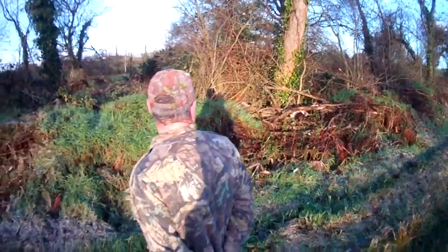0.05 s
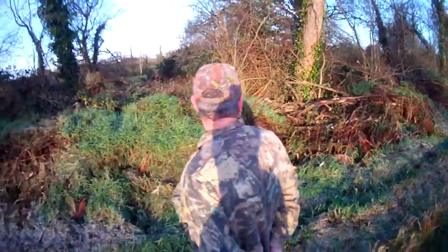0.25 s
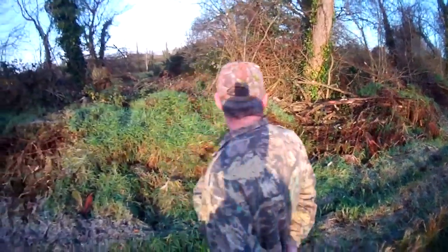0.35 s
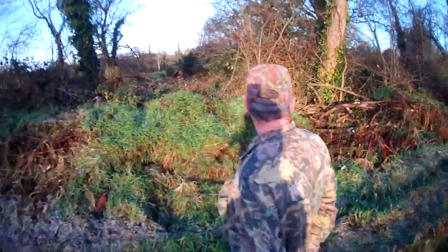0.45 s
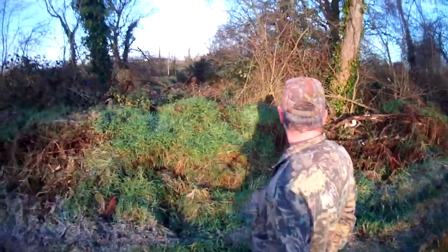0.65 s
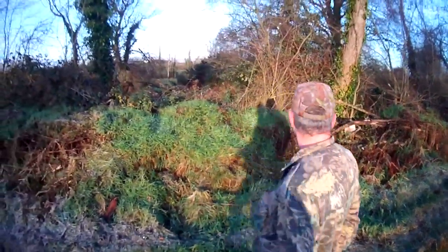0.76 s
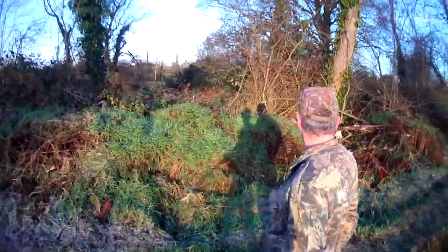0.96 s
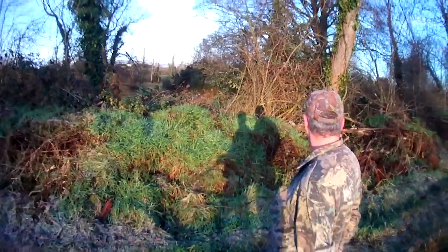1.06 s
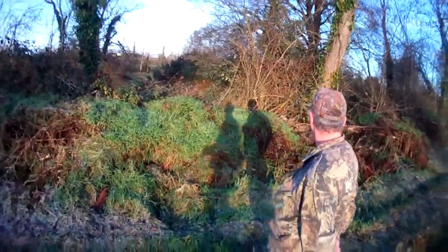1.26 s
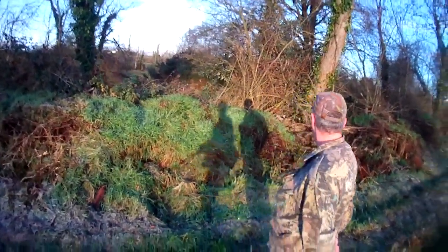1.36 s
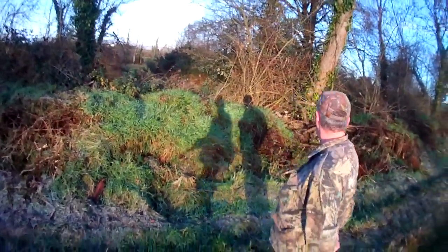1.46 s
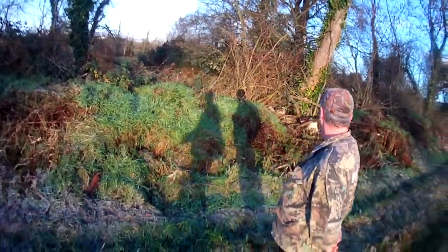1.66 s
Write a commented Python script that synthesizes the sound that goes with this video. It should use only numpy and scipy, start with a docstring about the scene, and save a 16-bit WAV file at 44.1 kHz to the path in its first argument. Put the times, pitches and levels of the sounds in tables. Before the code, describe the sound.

A dry twig snaps once, sharp and bright, close to the microphone at about 0.3 seconds, with a faint echo from the trees. Much quieter steps crush rough grass throughout, with swishes, jacket rubs, a few soft bumps and stem ticks that cluster near 1.4 seconds. From 0.7 to 1.5 seconds a distant bird whistles four thin, high notes over a steady hush and slight wind rumble.

```python
"""A dry twig gives way underfoot with one sharp snap, close to the microphone at the edge of a wood.
Its fibres split and ring; the sound scatters off the undergrowth and returns faintly from the trees.
Around it, steps crush rough grass, stems swish and tick, a jacket rubs and there are a few soft bumps.
Far off a bird pipes four thin notes over a steady hush, while light air rumbles on the microphone."""
import sys
import numpy as np
from scipy import signal
from scipy.fft import rfft, irfft, next_fast_len
from scipy.io import wavfile
from scipy.ndimage import map_coordinates

SR = 44100
rng = np.random.default_rng(int(sys.argv[2]) if len(sys.argv) > 2 else 0)


def wav_out(sig):
    """Save sig, one row per channel (or a flat mono array), as 16-bit PCM at SR to the path in sys.argv[1]."""
    wavfile.write(sys.argv[1], SR, np.round(np.clip(np.atleast_2d(sig).T, -1, 1) * 32767).astype(np.int16))


N = 74970


def amp(db):
    """Decibels to gain."""
    return 10 ** (np.asarray(db) / 20)


def unit(x):
    """Scale to rms 1."""
    return x / np.sqrt(np.mean(x ** 2) + 1e-20)


def along(points, hz):
    """Interpolate (frequency [Hz], value) points on a log axis."""
    freqs, values = np.transpose(points)
    return np.interp(np.log(hz + 1), np.log(freqs + 1), values)


def since(start=0):
    """Seconds since start, zero before it."""
    return np.maximum(np.arange(N) / SR - start, 0)


def level(rows):
    """Gain per sample from (time [s], level [dB]) points."""
    return amp(np.interp(since(), *np.transpose(rows)))


def fade(t, t60):
    """Sudden start, then a decay of 60 dB in t60 seconds."""
    return (t > 0) * np.exp(-np.log(1000) * t / t60)


def wobble(rate):
    """A smooth random curve, rate knots a second."""
    return map_coordinates(rng.standard_normal(2048), [since() * rate], mode="wrap")


def colour(x, spectrum, tilt_db=0):
    """Causal filter with the given spectrum and tilt per octave; rms 1."""
    size = 2 * next_fast_len(N)
    hz = np.fft.rfftfreq(size, 1 / SR)
    octaves = np.log2(np.clip(hz, 1000, 16000) / 4000)
    gain = amp(along(spectrum, hz) + tilt_db * octaves)
    cepstrum = irfft(np.log(np.maximum(gain, 1e-6)))
    cepstrum[1:size // 2] *= 2  # fold to minimum phase
    cepstrum[size // 2 + 1:] = 0
    return unit(irfft(rfft(x, size) * np.exp(rfft(cepstrum)))[:N])


def noise(spectrum):
    """Coloured noise of rms 1."""
    return colour(rng.standard_normal(N), spectrum)


def echo(x, decay, delay_s):
    """Diffuse reflections in which each frequency dies at its own speed."""
    hz, t, bands = signal.stft(rng.standard_normal(SR // 2), SR, nperseg=128)
    bands = bands * fade(t + 1e-9, along(decay, hz)[:, None])
    tail = signal.istft(bands, SR, nperseg=128)[1]
    delayed = np.pad(x, (int(delay_s * SR), 0))
    return signal.fftconvolve(delayed, tail / np.linalg.norm(tail))[:N]


def burst(start, t60, spectrum, tilt_db=0):
    """A dying cluster of tiny fractures, coloured by the stick that carries it."""
    shape = fade(since(start), t60)
    return colour(shape * rng.standard_normal(N), spectrum, tilt_db) * np.sqrt(np.mean(shape ** 2))


def brush(strokes, spectrum, rough_db):
    """Friction noise that swells and fades with each stroke."""
    swell = sum(amp(db) * np.exp(-((since() - centre) / half) ** 2) for centre, half, db in strokes)
    return swell * amp(rough_db * wobble(300)) * noise(spectrum)


# Open air all around: (frequency [Hz], gain [dB])
HUSH_SPECTRUM = [(53, -51), (90, -4), (204, -9), (639, -2.5), (983, -2.5), (1580, -2.5), (2000, -13),
                 (2140, -16.5), (2540, -5.5), (3580, -7.5), (4350, 0), (6270, -8), (10100, -8.5),
                 (15500, -10)]
# Breeze on the microphone: (time [s], level [dB])
GUSTS = [(0, -83), (.11, -70.5), (.18, -78), (.27, -73), (.46, -67.5), (.52, -77), (.61, -68), (.68, -79),
         (1.35, -81.5), (1.53, -75.5), (1.7, -84)]
# Its rumble: (frequency [Hz], gain [dB])
GUST_SPECTRUM = [(10, -8), (25, 3.5), (38, 4), (60, -6.5), (100, -19), (200, -39), (600, -58)]

def air(hush_db=-67):
    """Steady outdoor hush, and a light breeze buffeting the microphone."""
    hush = amp(hush_db + 1.5 * wobble(7.4)) * noise(HUSH_SPECTRUM)
    return hush + level(GUSTS) * noise(GUST_SPECTRUM)


# Reverberation of the wood: (frequency [Hz], t60 [s])
TREE_DECAY = [(300, 0.48), (4000, 0.1), (14000, .18)]

def trees(x, delay_s):
    """The trees beyond send back a diffuse answer."""
    return echo(x, TREE_DECAY, delay_s)


# Notes from far off: (start [s], length [s], top pitch [Hz], opening rise [Hz], level [dB])
BIRD_NOTES = [(.708, .112, 4075, 500, -56.5), (.946, .12, 3930, 260, -53), (1.183, .112, 3910, 200, -54.3),
              (1.43, .075, 3820, 60, -55.5)]

def bird(rise_s=.018, sag_hz=35, waver_hz=9, flutter_db=1, attack_s=.034, release_s=.032):
    """A distant bird's pure whistles slide up, hold and sag a little, echoing among the trees."""
    song = np.zeros(N)
    for start, length, top_hz, rise_hz, db in BIRD_NOTES:
        t = since(start)
        rise = rise_hz * np.exp(-t / rise_s)
        sag = sag_hz * np.minimum(t / length, 1) ** 4
        hz = top_hz - rise - sag + waver_hz * wobble(120)
        shape = np.clip(t / attack_s, 0, 1) * np.clip((length - t) / release_s, 0, 1)
        whistle = np.sqrt(2) * np.sin(2 * np.pi * np.cumsum(hz) / SR)
        song += amp(db + flutter_db * wobble(90)) * shape * whistle
    return song + amp(-13) * trees(song, delay_s=.034)


# Jacket rubs near the microphone: (centre [s], half length [s], level [dB])
JACKET_RUBS = [(.122, 0.0067, -60), (.365, .045, -63), (.66, 0.074, -65.5), (.85, 0.096, -68.5),
               (1.02, 0.038, -63), (1.215, .01, -64), (1.33, 0.062, -62.5)]
# The cloth: (frequency [Hz], gain [dB])
CLOTH_SPECTRUM = [(80, -38), (200, -11.5), (380, -9.5), (700, -5.5), (1350, 4), (2200, -3), (4000, -6.5),
                  (10000, -51)]

def jacket():
    """Cloth rubs as the body turns."""
    return brush(JACKET_RUBS, CLOTH_SPECTRUM, rough_db=2.5)


# Soft bumps close by: (time [s], level [dB], pitch [Hz], t60 [s])
SOFT_BUMPS = [(.528, -52, 505, 0.044), (.528, -61, 266, 0.11), (.598, -62, 270, .05),
              (.922, -60.5, 393, 0.064), (1.575, -61, 330, 0.056), (1.577, -52.5, 229, 0.033)]

def bumps(attack_s=.0017, jitter_rad=.82, low_cut_hz=170):
    """Dull, quickly damped knocks of boots or of a hand on the camera."""
    knocks = np.zeros(N)
    for start, db, hz, t60 in SOFT_BUMPS:
        t = since(start)
        shape = fade(t, t60) * (1 - np.exp(-t / attack_s))
        knocks += amp(db) * shape * np.sin(2 * np.pi * hz * t + jitter_rad * wobble(200))
    return signal.sosfilt(signal.butter(4, low_cut_hz, "high", fs=SR, output="sos"), knocks)


# Steps in the rough grass: (time [s], level [dB])
TREAD_LEVEL = [(0, -54), (.066, -58.5), (.122, -56), (.146, -59), (.2, -55), (.245, -56.5), (.288, -57),
               (.33, -53), (.392, -53), (.454, -63.5), (.586, -61), (.625, -60), (.68, -64), (.732, -54),
               (.756, -62), (.79, -53.5), (.88, -56), (.946, -54), (1.03, -58), (1.074, -60), (1.16, -58.5),
               (1.25, -62), (1.355, -58.5), (1.386, -58), (1.42, -52), (1.444, -61.5), (1.462, -53),
               (1.485, -64.5), (1.53, -62), (1.6, -63.5), (1.7, -61)]
# Crushed grass: (frequency [Hz], gain [dB])
GRASS_SPECTRUM = [(120, -79), (200, -15), (385, -11), (544, -9), (618, -9), (1090, -9.5), (1880, -4),
                  (2800, -0.5), (3120, -0.5), (4030, 5), (6830, -12), (12900, -23.5), (15500, -29)]

def tread(crackles_per_s=1500, spread_db=3, crackle_db=-6):
    """Grass crushed underfoot gives dense tiny crackles over a rustle."""
    sizes = amp(spread_db * np.minimum(rng.exponential(size=N), 4)) * rng.standard_normal(N)
    crackle = colour(sizes * (rng.random(N) < crackles_per_s / SR), GRASS_SPECTRUM)
    crush = level(TREAD_LEVEL) * amp(1.15 * wobble(70.6))
    return crush * unit(noise(GRASS_SPECTRUM) + amp(crackle_db) * crackle)


# Swishes at boot height: (centre [s], half length [s], level [dB])
BLADE_STROKES = [(.2185, .0055, -43.5), (0.224, 0.055, -56), (0.326, 0.041, -58), (0.613, .018, -53),
                 (0.719, 0.057, -58.5), (1.04, 0.0086, -56.5), (1.512, 0.013, -57)]
# Sliding blades: (frequency [Hz], gain [dB])
BLADE_SPECTRUM = [(290, -63), (500, -19), (2010, -11), (2720, -5.5), (3850, -3.5), (4190, -3), (4440, -2.5),
                  (11000, -14.5), (12100, -12.5), (15500, -18)]

def swishes():
    """Blades of grass brush past the boots."""
    return brush(BLADE_STROKES, BLADE_SPECTRUM, rough_db=3.03)


# Ticks around the feet: (time [s], level [dB], t60 [s], treble tilt [dB/octave])
STEM_TICKS = [(0.1107, -46.5, 0.036, -3), (0.235, -47, 0.017, 2), (0.2466, -48, 0.016, 7),
              (0.2609, -54, 0.011, 1), (0.603, -44, 0.043, 4.5), (0.646, -51.5, 0.09, 4),
              (0.724, -48.5, 0.083, 3), (0.7952, -44.5, 0.029, 1.5), (0.8336, -51.5, 0.023, -11),
              (0.865, -50.5, 0.023, -11.5), (0.925, -57.5, 0.04, 9), (1.178, -49, 0.025, -1.5),
              (1.3505, -52.5, 0.041, -11.5), (1.367, -47, 0.053, 5), (1.3968, -38.5, 0.012, 5),
              (1.4004, -42, 0.015, -.5), (1.4094, -37.5, 0.02, 2.5), (1.414, -45.5, 0.022, -4.5),
              (1.456, -48, 0.011, 11.5), (1.553, -57, .02, -8), (1.579, -52.5, 0.03, -2.5),
              (1.6313, -52, 0.047, 3.5)]
# A dry stem: (frequency [Hz], gain [dB])
STEM_SPECTRUM = [(100, -33), (300, -39.5), (650, -25), (1400, -9), (2500, -4), (4100, 2), (5200, -7.5),
                 (7000, -14.5), (13000, -25), (15500, -31)]

def stems():
    """Dry stems and leaves tick, each with its own brightness."""
    return sum(amp(db) * burst(start, t60, STEM_SPECTRUM, tilt) for start, db, t60, tilt in STEM_TICKS)


# Scatter near the ground: (frequency [Hz], t60 [s])
UNDERGROWTH_DECAY = [(500, 0.1), (4000, 0.033), (14000, .028)]

def undergrowth(x):
    """Nearby growth scatters the sound back almost at once."""
    return echo(x, UNDERGROWTH_DECAY, delay_s=.002)


# Close up, the twig cracks, then breaks in quick stages: (time [s], relative level [dB], pitch [Hz])
TWIG_BREAKS = [(0.2642, -27.5, 4270), (0.2657, -27.5, 5070), (.2992, -14, 5720), (.3003, -13, 5390),
               (.3018, -20.5, 5240)]
# Its modes: (ratio to the pitch, gain [dB], t60 [s])
TWIG_MODES = [(.62, -18, 0.0059), (.8, -9, .009), (1.039, -2, 0.013), (1.62, -13.5, 0.02)]
# Splitting fibres: (frequency [Hz], gain [dB])
FIBRE_SPECTRUM = [(100, -38), (300, -46), (650, -19), (1160, -23), (1750, -10), (2500, -10), (3200, -3),
                  (4500, -6), (5600, 6), (6600, -8.5), (8800, -5), (10600, -11.5), (14500, -14),
                  (15600, -26)]

def twig(crack_db=-5, crack_t60_s=.0058, ring_db=-7.5, low_cut_hz=2540):
    """Each stage of the break is a burst of splitting fibres and a very short ring of the wood."""
    crack, ring = np.zeros(N), np.zeros(N)
    for start, db, hz in TWIG_BREAKS:
        t = since(start)
        crack += amp(db) * burst(start, crack_t60_s, FIBRE_SPECTRUM)
        for ratio, mode_db, t60 in TWIG_MODES:
            ring += amp(db + mode_db) * fade(t, t60) * np.sin(2 * np.pi * hz * ratio * t)
    # cut the lows so the ring stays thin and bright
    ring = signal.sosfilt(signal.butter(2, low_cut_hz, "high", fs=SR, output="sos"), ring)
    return amp(ring_db) * ring + amp(crack_db) * crack


def scene():
    """One microphone at the wood's edge: snap and walker close by, trees and bird beyond."""
    snap = twig()
    near = snap + amp(-6) * undergrowth(snap) + stems()
    walker = tread() + swishes() + jacket() + bumps()
    background = amp(-19) * trees(near, delay_s=.017) + bird() + air()
    return (background + walker + near)[None]


def record(dry, top_hz=15600):
    """The camera keeps nothing above its band limit."""
    return signal.sosfilt(signal.ellip(12, .1, 90, top_hz, fs=SR, output="sos"), dry)


dry = scene()
out = record(dry)
wav_out(out)
```